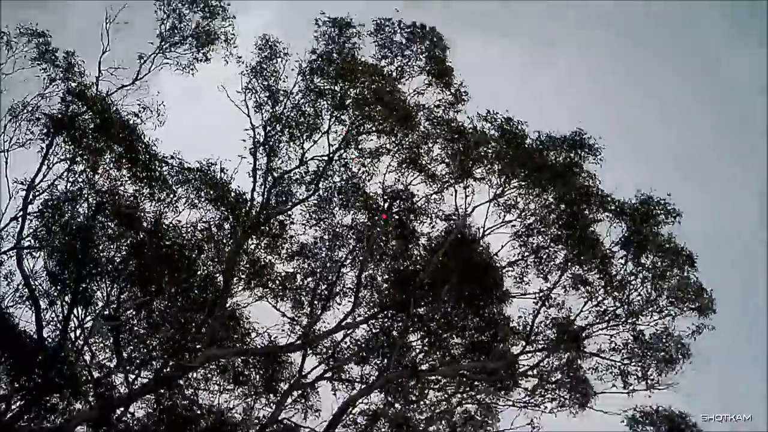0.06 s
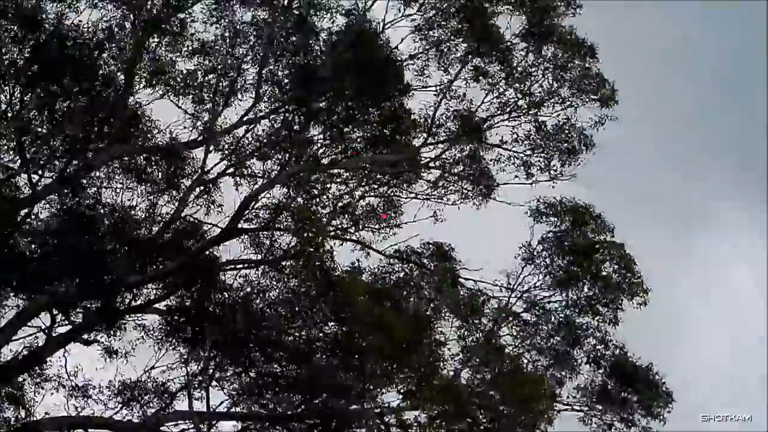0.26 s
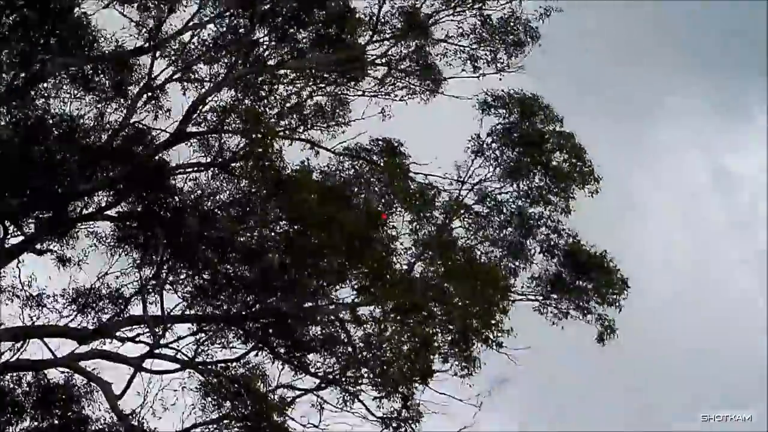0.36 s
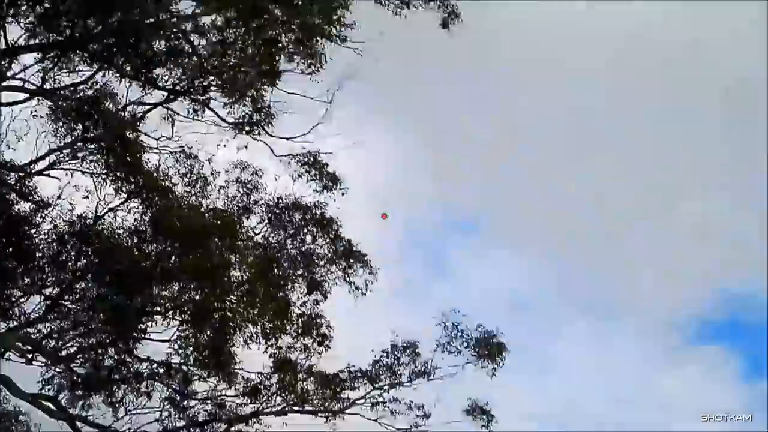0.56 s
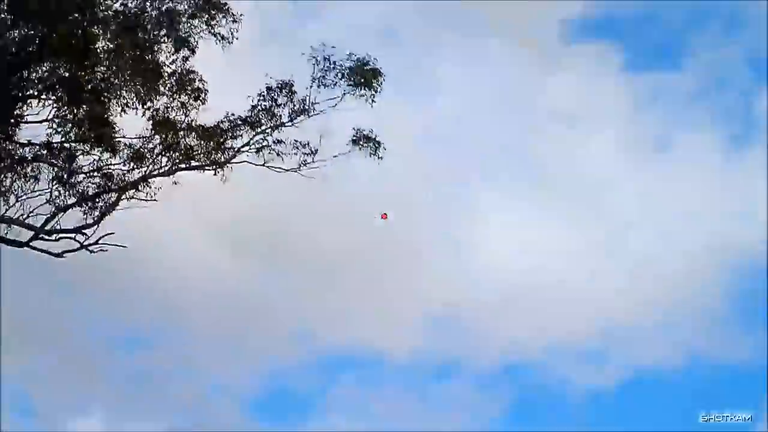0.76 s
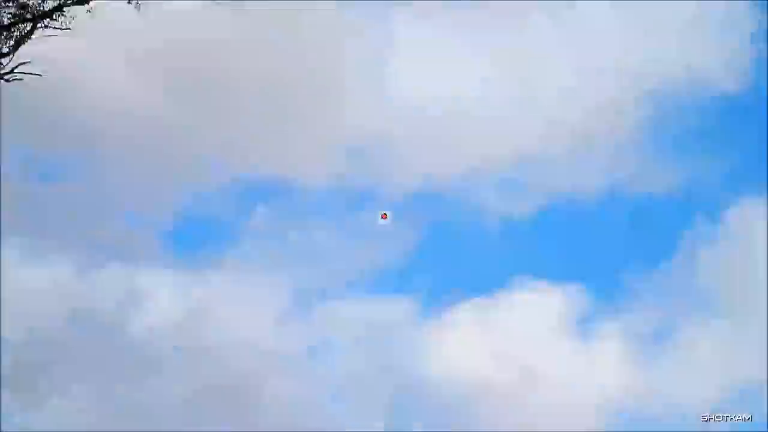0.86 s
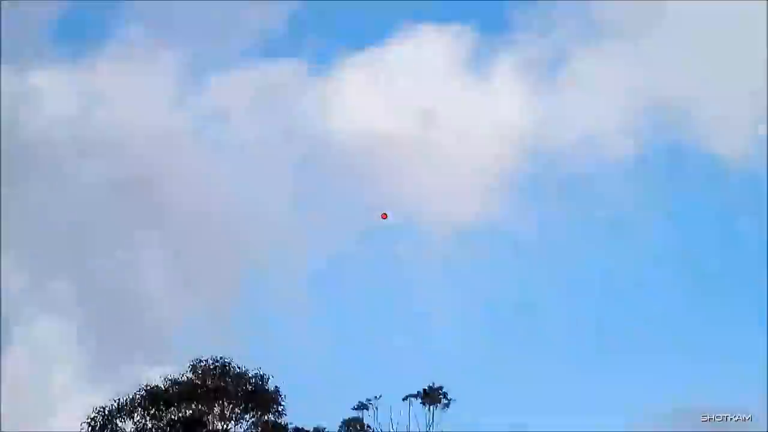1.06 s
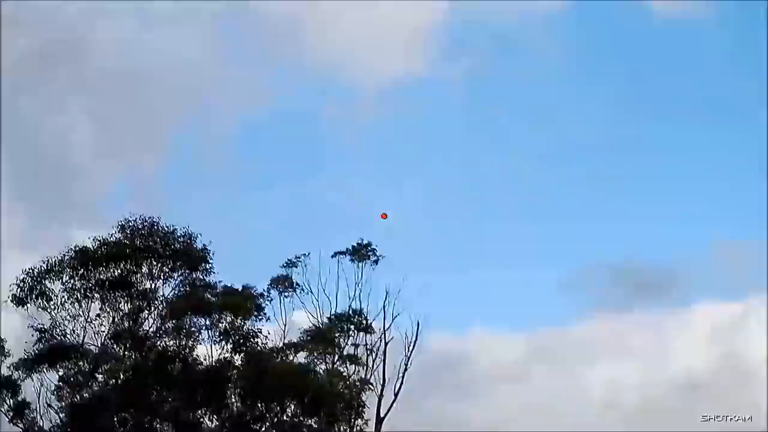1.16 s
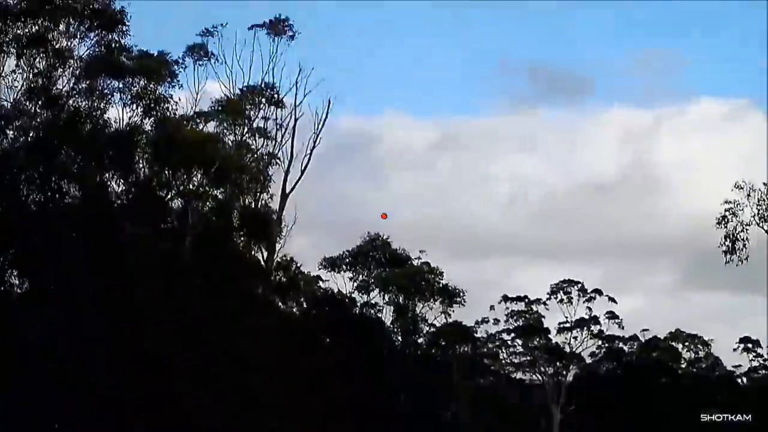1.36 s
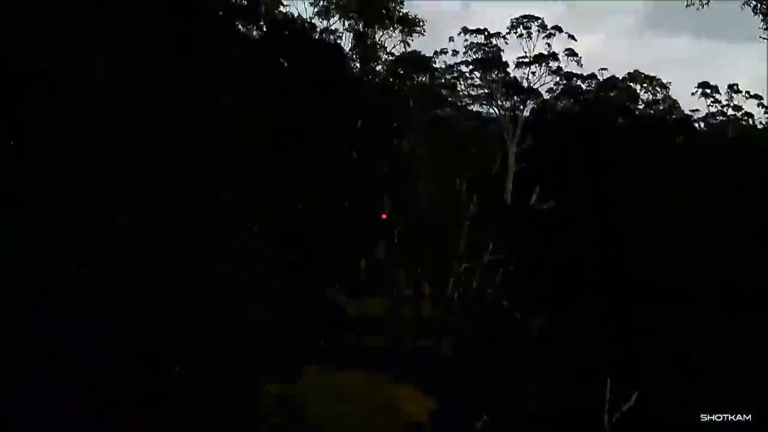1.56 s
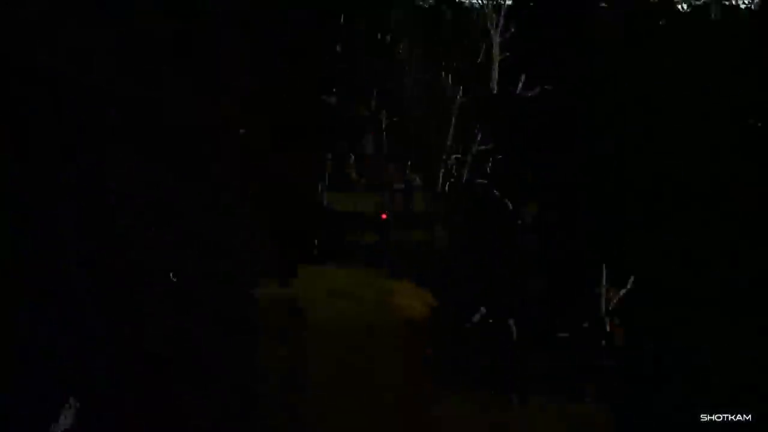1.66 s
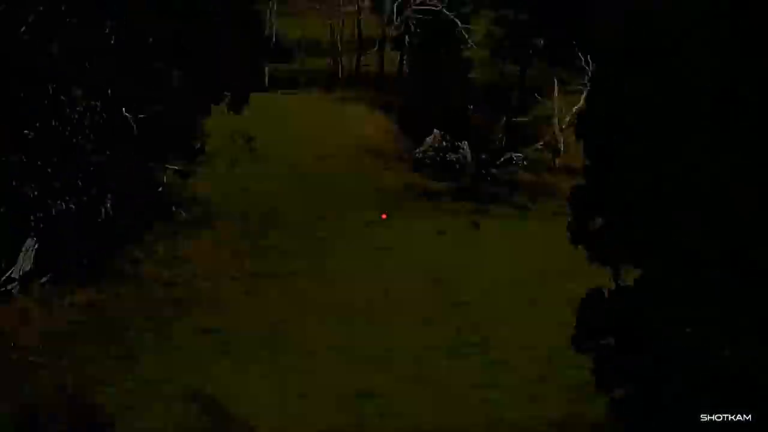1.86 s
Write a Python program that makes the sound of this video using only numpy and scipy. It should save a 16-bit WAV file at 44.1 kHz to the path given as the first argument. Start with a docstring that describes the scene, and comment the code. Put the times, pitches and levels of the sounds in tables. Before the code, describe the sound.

Sharp metallic click of a shotgun hammer, followed by handling bumps and a softer clack.

```python
"""A shotgun swung outdoors, heard at contact distance: the microphone is fixed to the gun itself.
The hammer falls with a sharp click, steel on steel, and leaves its spring ringing. Hands rub and
bump the stock, right by the microphone; then the action clacks once more and small steel parts tick.
Behind the gun lie a low rumble of moving air and the microphone's steady hiss."""
import sys
import numpy as np
from scipy import signal
from scipy.fft import rfft, irfft
from scipy.io import wavfile

SR = 44100
rng = np.random.default_rng(int(sys.argv[2]) if len(sys.argv) > 2 else 0)


def persist_wave(psi):
    """Save psi, clipped to +-1, as 16-bit WAV."""
    counts = np.round(np.clip(psi, -1, 1) * 32767).astype(np.int16)
    wavfile.write(sys.argv[1], SR, np.atleast_2d(counts).T)


N = 83790

# hard blows of trigger, hammer, its rebound and latch:
# (time [s], body level [dB], bass cut [Hz], steel level [dB], treble cut [Hz], push [gain, rebound < 0])
ACTION_BLOWS = [(0.2040, -56, 400, -34, 2500, 0.74), (0.2115, -40, 302, -26, 4980, 0.1),
                (0.2122, -9.5, 100, -20, 4540, 1), (0.2184, -18, 128, -44, 3000, -1.36),
                (1.6220, -34, 1000, -49, 1970, 0.97), (1.6335, -14, 770, -30, 2980, 0.94),
                (1.6351, -22.5, 753, -38, 2700, -0.3), (1.6420, -33.5, 930, -34, 2600, 1)]
# stock, barrels and microphone mount: (frequency [Hz], level [dB], t60 [s])
BODY_MODES = [(93, -18, 0.19), (205.7, -15.5, 0.13), (377.6, -28.5, 0.091), (516, -8.5, 0.045),
              (682, -3.5, 0.05), (780, -9.5, 0.031), (1022, -9, 0.022), (1185, -12, 0.046),
              (1312, -18, .05), (1477, -25, 0.039)]
# the steel action: (frequency [Hz], level [dB], t60 [s])
STEEL_MODES = [(1620, -22, 0.04), (1980, -15.5, 0.049), (2334, -16, 0.038), (2730, -42, .05),
               (2880, -19.5, 0.034), (2970, -21.5, 0.056), (3290, -17, 0.053), (3560, -15, .035),
               (4060, -17.5, 0.044), (4640, -33.5, 0.024), (5300, -21.5, 0.021), (6600, -44.5, .025),
               (7040, -28, 0.02)]
# the hammer spring: (frequency [Hz], level [dB], t60 [s])
SPRING_MODES = [(615, -46, .2), (1082, -66, 3.5), (1157, -27.5, .2), (1227, -29.5, .23), (2299, -56, .22)]
# hammer and latch kick the spring: (time [s], level [dB])
SPRING_KICKS = [(0.2169, -0.5), (1.636, -16)]
# hands bump the stock: (time [s], level [dB], bass cut [Hz], treble cut [Hz])
HAND_BUMPS = [(0.042, -39.5, 150, 800), (0.081, -42.5, 200, 800), (0.234, -8.5, 50, 122),
              (0.303, -45, 300, 800), (0.345, -45, 400, 800), (0.444, -42, 393, 850),
              (0.473, -37, 100, 476), (0.624, -44.5, 400, 850), (0.678, -42.5, 406, 850),
              (0.707, -58, 300, 990), (0.743, -33, 250, 650), (0.838, -40.5, 800, 1400),
              (0.858, -14.5, 58, 130), (0.923, -45, 400, 750), (1.047, -38.5, 204, 900),
              (1.15, -30, 50, 128.6), (1.171, -35.5, 103.4, 850), (1.195, -14.5, 50, 126.7),
              (1.2005, -32.5, 150, 700), (1.2100, -22, 77.7, 700), (1.2175, -32, 79, 620),
              (1.279, -39, 414, 900), (1.309, -36.5, 700, 1400), (1.442, -33, 300, 800),
              (1.4575, -22, 1344, 1600), (1.4683, -30, 450, 1124), (1.4750, -21.5, 447, 784),
              (1.496, -35, 50, 750), (1.502, -30, 680, 1100), (1.5535, -39, 396, 850),
              (1.5905, -43.5, 200, 825), (1.707, -37.5, 600, 800), (1.758, -28.5, 170, 254)]
# loose steel parts: (time [s], level [dB], pitch [Hz], snap level [dB])
PART_TICKS = [(0.836, -53.5, 2000, -62), (1.307, -53.5, 2600, -65), (1.403, -51.5, 1280, -85),
              (1.452, -47, 2400, -76), (1.466, -51, 2250, -69), (1.497, -48, 1600, -74),
              (1.7034, -47.5, 2200, -51.5), (1.7063, -43.5, 3130, -52.5), (1.7472, -45, 3160, -44)]
# the grip shifts on the stock: (time [s], rub level [dB], flex level [dB])
GRIP_LEVELS = [(0, -71, -69), (0.06, -71.5, -48), (0.165, -74, -65), (0.205, -44.5, -38.5),
               (0.251, -55, -50), (0.33, -69.5, -72.5), (0.42, -76, -61.5), (0.5, -70, -50.5),
               (0.56, -80, -66), (0.71, -63, -53.5), (0.78, -58.5, -53), (0.88, -57, -51), (0.98, -58, -54),
               (1.08, -56.5, -51), (1.23, -60, -46), (1.39, -66.5, -60.5), (1.49, -44.5, -47.5),
               (1.55, -60, -57.5), (1.661, -56, -48.5), (1.78, -66.5, -83.5), (1.9, -63, -68)]
# the grip slips evenly: (peak time [s], length [s], level [dB])
GRIP_GROANS = [(1.084, 0.14, -47.5), (1.771, 0.066, -55)]
# air moving past the microphone: (frequency [Hz], relative level [dB])
AIR_SPECTRUM = [(12, 4.5), (25, -1), (45, -6.5), (70, -0.5), (130, -13.5), (300, -25.5), (700, -30),
                (1500, -40.5)]
# the microphone's own noise: (frequency [Hz], relative level [dB])
HISS_SPECTRUM = [(200, 3.5), (1000, 14.5), (2000, 8), (3500, 6), (5000, 3.5), (7000, 6), (8000, 5),
                 (10000, -44)]

CRACK_DB, CRACK_T60_S, CRACK_LOW_HZ = -4, 0.012, 510
CHATTER_DB, CHATTER_T60_S, CHATTER_HZ, CHATTER_WIDTH_HZ = -0.5, 0.046, 2600, 1000
HAMMER_S, JOLT_HZ, JOLT_DB, JOLT_T60_S = 0.2165, 23.8, -21.5, 0.18
TICK_T60_S, TICK_WIDTH_HZ, TICK_RISE_S, TICK_RING_DB = 0.03, 220, 0.0023, 9.5
SNAP_LOW_HZ, SNAP_T60_S = 3800, 0.012
SLIPS_PER_S, SLIP_SPREAD_DB, GROAN_HZ = 1500, 4.5, 214.7
RUB_BAND_HZ, FLEX_BAND_HZ, RUB_DIRECT_DB = (406, 588), (130, 187), 2.5
AIR_DB, HISS_DB = -49.5, -67
MIC_TOP_HZ, CUTOFF_HZ = 7130, 8400


def action():
    """Steel strikes steel: it cracks, rings and buzzes; the body carries the blow to the microphone."""
    on_body = on_steel = crack = chatter = 0
    for s, body_db, bass_hz, steel_db, treble_hz, push in ACTION_BLOWS:
        on_body += push * from_db(body_db) * cut(click(s), bass_hz, "high")
        on_steel += from_db(steel_db) * cut(click(s), treble_hz, "low")
        crack += from_db(steel_db + CRACK_DB) * cut(burst(s, CRACK_T60_S), treble_hz, "low", order=3)
        chatter += from_db(steel_db + CHATTER_DB) * burst(s, CHATTER_T60_S)
    ringing = ring(on_body, BODY_MODES) + ring(on_steel, STEEL_MODES)
    buzz = resonance(resonance(chatter, CHATTER_HZ, CHATTER_WIDTH_HZ), CHATTER_HZ, CHATTER_WIDTH_HZ)
    return ringing + cut(crack, CRACK_LOW_HZ, "high") + buzz


def hammer_spring():
    """Hard blows ring the spring's close, beating modes; the falling hammer also jolts the whole gun."""
    kicks = sum(from_db(db) * click(s) for s, db in SPRING_KICKS)
    jolt = ring(click(HAMMER_S), [(JOLT_HZ, JOLT_DB, JOLT_T60_S)])
    return ring(kicks, SPRING_MODES) - jolt


def hand_bumps():
    """Hands bump the stock, from dull low thuds to lighter, higher knocks."""
    force = sum(from_db(db) * band(click(s), low_hz, high_hz) for s, db, low_hz, high_hz in HAND_BUMPS)
    return ring(force, BODY_MODES)


def part_ticks():
    """Small parts snap and rattle briefly against the action, which rings faintly."""
    t, out = np.arange(N) / SR, 0
    band_makeup = np.sqrt(SR / (np.pi * TICK_WIDTH_HZ))   # keeps the narrowed rattle at strength
    for s, db, hz, snap_db in PART_TICKS:
        rise = np.clip((t - s) / TICK_RISE_S, 0, 1)
        rattle = burst(s, TICK_T60_S) * rise * band_makeup
        steel = from_db(TICK_RING_DB) * ring(click(s), STEEL_MODES)
        snap = cut(burst(s, SNAP_T60_S), SNAP_LOW_HZ, "high")
        out += from_db(db) * resonance(rattle + steel, hz, TICK_WIDTH_HZ) + from_db(snap_db) * snap
    return out


def skin_slips():
    """Skin sticks and slips in a dense run of tiny impulses of uneven size."""
    sizes = from_db(SLIP_SPREAD_DB * np.minimum(rng.exponential(1, N), 4))
    signs = rng.choice([-1, 1], N)
    return sizes * signs * (rng.random(N) < SLIPS_PER_S / SR)


def hand_rub():
    """Close friction, heard directly and through the stock; the shifting grip stirs the lowest modes."""
    s, rub_db, flex_db = np.transpose(GRIP_LEVELS)
    t = np.arange(N) / SR
    friction = band(skin_slips(), *RUB_BAND_HZ)
    rub = rms_one(ring(friction, BODY_MODES)) + from_db(RUB_DIRECT_DB) * rms_one(friction)
    flex = rms_one(ring(band(skin_slips(), *FLEX_BAND_HZ), BODY_MODES))
    return from_db(np.interp(t, s, rub_db)) * rub + from_db(np.interp(t, s, flex_db)) * flex


def grip_groans():
    """Regular stick-slip swells and fades near a low mode of the stock."""
    t = np.arange(N) / SR
    swell = sum(from_db(db) * np.exp(-(2 * (t - s) / length) ** 2) for s, length, db in GRIP_GROANS)
    return swell * np.sqrt(2) * np.sin(2 * np.pi * GROAN_HZ * t)


def air_rumble():
    """Moving air rumbles low on the microphone."""
    return from_db(AIR_DB) * coloured_noise(AIR_SPECTRUM)


def microphone_hiss():
    """The microphone's steady noise floor."""
    return from_db(HISS_DB) * coloured_noise(HISS_SPECTRUM)


def from_db(db):
    """Decibels to gain."""
    return 10 ** (np.asarray(db) / 20)


def rms_one(x):
    """Scale to unit rms."""
    return x / np.sqrt(np.mean(x ** 2) + 1e-20)


def cut(x, hz, kind, order=2):
    """Butterworth low- or high-pass."""
    return signal.sosfilt(signal.butter(order, hz, kind, fs=SR, output="sos"), x + 1e-18)


def band(x, low_hz, high_hz):
    """A gentle bass cut and a steeper treble cut."""
    return cut(cut(x, low_hz, "high"), high_hz, "low", order=4)


def click(s):
    """A unit impulse at time s."""
    return np.maximum(0, 1 - np.abs(np.arange(N) - s * SR))


def burst(s, t60):
    """Noise that starts at time s and dies away."""
    age = np.arange(N) / SR - s
    return rng.standard_normal(N) * (age >= 0) * np.exp(-np.log(1000) * np.abs(age) / t60)


def ring(force, modes):
    """Each mode answers an impulse with a dying sine; neighbours swing in opposite senses."""
    out = 0
    for k, (hz, db, t60) in enumerate(modes):
        r, w = np.exp(-np.log(1000) / (t60 * SR)), 2 * np.pi * hz / SR
        mode = signal.lfilter([0, np.sin(w)], [1, -2 * r * np.cos(w), r * r], force + 1e-18)
        out += (-1) ** k * from_db(db) * mode
    return out


def resonance(x, hz, width_hz):
    """A broad peak of gain 1."""
    r, w = np.exp(-np.pi * width_hz / SR), 2 * np.pi * hz / SR
    return signal.lfilter(np.array([1, 0, -1]) * (1 - r * r) / 2, [1, -2 * r * np.cos(w), r * r], x + 1e-18)


def coloured_noise(spectrum):
    """Steady noise of the given spectrum, rms 1."""
    hz, db = np.transpose(spectrum)
    bins = np.maximum(np.fft.rfftfreq(N, 1 / SR), 1)
    gain = from_db(np.interp(np.log(bins), np.log(hz), db))
    return rms_one(irfft(rfft(rng.standard_normal(N)) * gain, N))


def scene():
    """The gun and hands up close, air and hiss behind, in mono."""
    background = air_rumble() + microphone_hiss()
    gun = action() + hammer_spring() + hand_bumps() + part_ticks() + hand_rub() + grip_groans()
    return (gun + background)[None]


def record(dry):
    """The microphone's top rolls off, then is cut steeply."""
    dull = cut(dry, MIC_TOP_HZ, "low", order=6)
    return signal.sosfilt(signal.cheby2(16, 55, CUTOFF_HZ, fs=SR, output="sos"), dull)


dry = scene()
out = record(dry)
persist_wave(out)
```